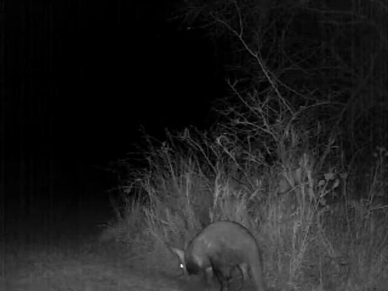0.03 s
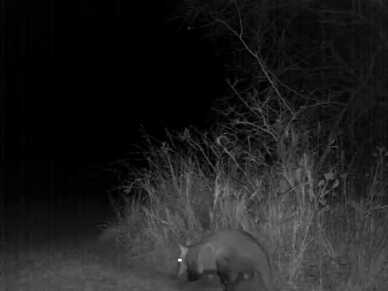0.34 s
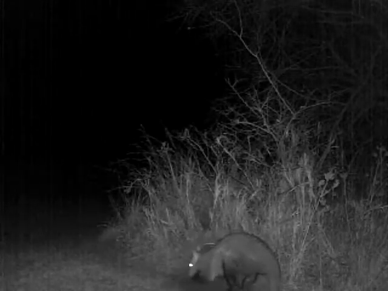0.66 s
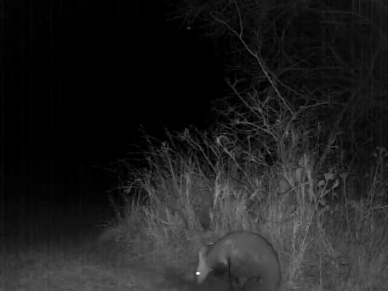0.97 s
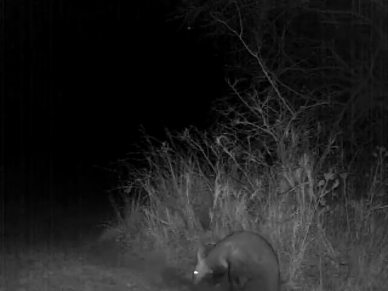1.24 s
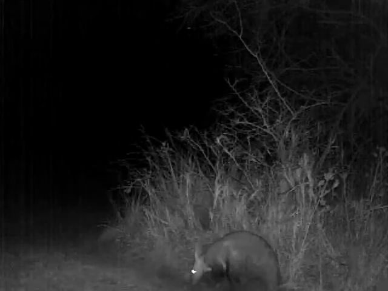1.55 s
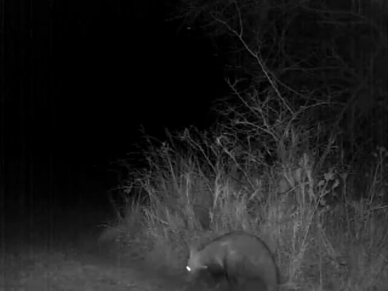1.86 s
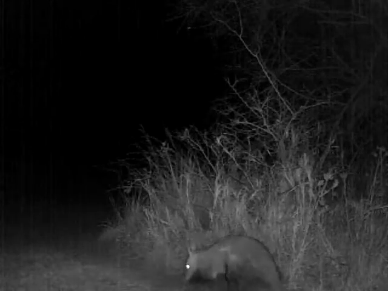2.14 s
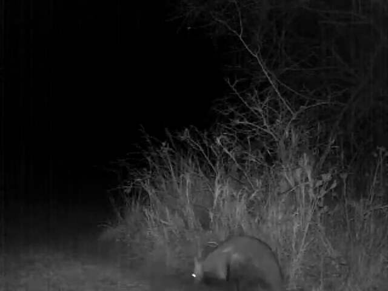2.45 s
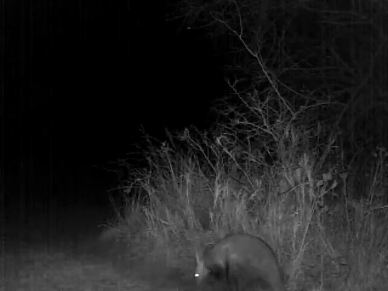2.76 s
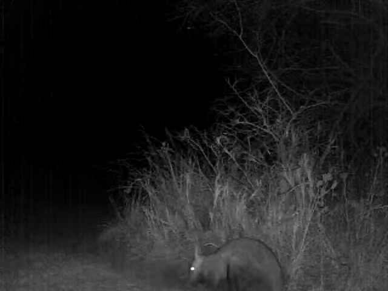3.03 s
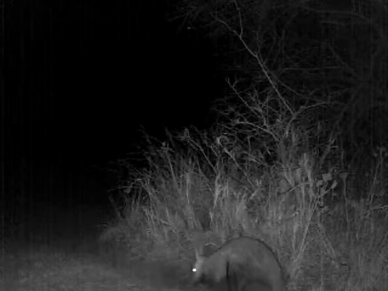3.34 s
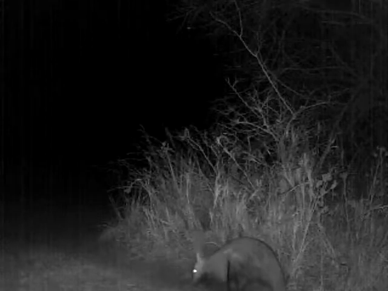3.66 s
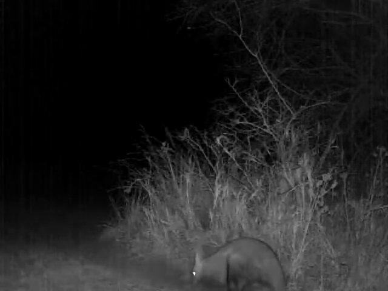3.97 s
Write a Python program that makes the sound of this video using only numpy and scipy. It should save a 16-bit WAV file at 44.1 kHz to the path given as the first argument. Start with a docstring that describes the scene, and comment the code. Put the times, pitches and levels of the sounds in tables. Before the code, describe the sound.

An animal digs in crumbly soil a few metres away. From about 0.2 seconds, claws scrape, paws thump and dry grass rustles, with the sharpest snaps at 0.5 and 0.7 seconds. Activity fades around 1.4 seconds, then resumes at 1.9 with a grassy swish and short scrapes and cracks until 4 seconds. A tiny squeak comes near 2.8. Steady hiss, low electrical pulsing and a faint high whine continue throughout.

```python
"""A steady night hiss and a trail camera's own low electrical pulsing, with a faint insect-like whine.
A few metres from the camera an animal brushes through dry grass and digs: its claws scrape
crumbling soil, earth thuds, paws thump, stalks and clods snap, and once something squeaks.
All of it reaches one small microphone that rings near 3 kHz."""
import sys
import numpy as np
from scipy.fft import rfft, irfft, next_fast_len
from scipy.io import wavfile
from scipy.ndimage import map_coordinates

SR = 44100
rng = np.random.default_rng(int(sys.argv[2]) if len(sys.argv) > 2 else 0)


def generate_wav(signal):
    """Clip the signal to [-1, 1] and save it as 16-bit WAV at the path in sys.argv[1]."""
    frames = np.transpose(np.atleast_2d(signal))
    scaled = np.clip(frames, -1, 1) * 32767
    pcm = np.round(scaled).astype(np.int16)
    wavfile.write(sys.argv[1], SR, pcm)


N = 176400


def amp(db):
    """Decibels to gain."""
    return 10 ** (np.asarray(db) / 20)


def unit(x):
    """Scaled to rms 1."""
    return x / np.sqrt(np.mean(x ** 2) + 1e-20)


def coloured(x, points):
    """x through a causal filter with the given (Hz, dB) points."""
    size = 2 * next_fast_len(N // 2 + 8192)
    hz, db = np.transpose(points)
    gain = amp(np.interp(np.log(np.fft.rfftfreq(size, 1 / SR) + 1), np.log(hz), db))
    # Folding the cepstrum gives minimum phase: nothing rings ahead of a click.
    cepstrum = irfft(np.log(gain), size)
    cepstrum[1:size // 2] *= 2
    cepstrum[size // 2 + 1:] = 0
    return irfft(rfft(x, size) * np.exp(rfft(cepstrum)), size)[:N]


def wobble(rate):
    """A smooth random curve, rate knots a second."""
    knots = rng.standard_normal(int(N * rate / SR) + 4)
    return map_coordinates(knots, [np.arange(N) * rate / SR])


def grains(rate, spread_db, clump_db):
    """Tiny fractures of uneven size, rate a second, that swell in clumps."""
    sizes = amp(spread_db * np.clip(rng.standard_normal(N), -2, 2)) * rng.choice([-1, 1], N)
    breaks = rng.random(N) < rate / SR
    return breaks * sizes * amp(clump_db * wobble(170))


def strokes(rows, level_column):
    """Envelope of all strokes: each rises, holds, then fades over a span centred on its end."""
    t, power = np.arange(N) / SR, np.zeros(N)
    attack_share = 0.16
    for row in rows:
        start, length = row[:2]
        progress = (t - start) / length
        shape = np.clip(progress / attack_share, 0, 1) * np.clip(1.5 - progress, 0, 1)
        power += (amp(row[level_column]) * shape) ** 2
    return np.sqrt(power)


def hiss():
    """Steady hiss of the night air and the microphone."""
    # The colour of the hiss. Each row: frequency in Hz, gain in dB.
    hiss_colour = [(20, 21.5), (70, 8.5), (160, 2), (380, -4), (750, -6), (1600, 0), (3000, -2), (5000, -5),
                   (8000, -5.5), (11000, -6), (15000, -67)]
    return amp(-38.5 + 0.13 * wobble(6.56)) * unit(coloured(rng.standard_normal(N), hiss_colour))


def insect():
    """A faint thin whine, probably an insect far off in the grass."""
    t, pitch_hz = np.arange(N) / SR, 9150
    level = amp(-57 + 2 * wobble(12))
    return level * np.sin(2 * np.pi * pitch_hz * t + 2 * wobble(200))


def camera_pulses():
    """The camera's electronics pulse twelve times a second, on ticks of a 20 Hz clock, so the beat limps."""
    frame_s, tick_s, width_s = 0.083958, 0.04985, 0.0056
    t = np.arange(N) / SR
    frames = np.arange(1, int(N / SR / frame_s) + 1)
    times = tick_s * np.floor(frames * frame_s / tick_s + 0.76) - 0.002
    sizes = amp(-25 + rng.normal(0, 0.52, len(times)))
    return -sum(size / (1 + ((t - at) / width_s) ** 2 / 2) ** 2 for at, size in zip(times, sizes))


def grass():
    """Stalks crackle, fine blades swish and dry tips tick as the body pushes past."""
    # Brushes against dry grass. Each row: start in seconds, length in seconds, stalks in dB, blades in dB.
    brushes = [(.145, 0.047, -41, -41), (.21, 0.22, -38, -40), (.277, 0.045, -32, -32),
               (.33, 0.18, -40, -42.5), (.48, 0.38, -39.5, -41.5), (.673, 0.11, -36, -33),
               (.76, 0.17, -37, -36.5), (.92, 0.17, -42.5, -41.5), (1.11, 0.097, -40, -42.5),
               (1.185, 0.11, -34, -39.5), (1.29, 0.12, -42, -52), (1.47, 0.14, -46, -54),
               (1.9, 0.23, -41.5, -39.5), (1.955, 0.14, -32.5, -28), (2.068, 0.042, -34, -24.5),
               (2.115, 0.082, -36.5, -39), (2.19, 0.14, -38.5, -41), (2.355, 0.08, -36, -37.5),
               (2.435, .075, -36, -57), (2.67, 0.29, -45.5, -48), (2.89, 0.15, -37.5, -40.5),
               (3.19, 0.083, -37, -48), (3.365, 0.051, -38, -32.5), (3.41, 0.12, -43, -54),
               (3.59, 0.11, -45, -46), (3.775, 0.036, -44, -41)]
    # The mid-range crackle of stalks. Each row: frequency in Hz, gain in dB.
    stalk_colour = [(200, -29.5), (900, -18.5), (1800, -2.5), (3000, 0), (4200, -3.5), (6000, -11),
                    (12000, -48)]
    # The high swish of blades. Each row: frequency in Hz, gain in dB.
    blade_colour = [(500, -32), (3000, -7), (5000, -2.5), (7000, -2.5), (10500, -8), (14000, -37)]
    stalks = unit(coloured(grains(rate=3500, spread_db=4.0, clump_db=2.04), stalk_colour))
    swish = unit(grains(rate=5000, spread_db=-1.5, clump_db=2.0))
    ticks = amp(-1) * unit(grains(rate=110, spread_db=3.0, clump_db=0.0))
    blades = unit(coloured(swish + ticks, blade_colour))
    return stalks * strokes(brushes, level_column=2) + blades * strokes(brushes, level_column=3)


def digging():
    """Claws break crumbs of soil loose while the earth thuds under them."""
    # Claw strokes. Each row: start in seconds, length in seconds, grit in dB, thud of earth in dB.
    scrapes = [(.287, 0.046, -28.5, -31), (.343, 0.078, -37.5, -37.5), (.463, 0.023, -35, -34.5),
               (.496, 0.042, -29.5, -31), (.548, .035, -36, -35), (.678, 0.023, -29.5, -33),
               (.715, 0.08, -39, -45), (.798, 0.13, -40, -41.5), (.95, 0.028, -37, -40),
               (1.865, 0.01, -35.5, -44.5), (1.905, 0.023, -37.5, -37.5), (1.99, 0.12, -36, -41),
               (2.12, 0.027, -36, -38.5), (2.222, 0.033, -29.5, -38.5), (2.26, .055, -35, -42),
               (2.355, 0.062, -35, -38), (2.43, 0.14, -40, -47), (2.558, 0.047, -35.5, -43.5),
               (2.622, 0.051, -34.5, -40), (3.0, 0.035, -33, -43), (3.053, 0.041, -35.5, -39.5),
               (3.09, 0.033, -34.5, -51), (3.12, 0.074, -38, -41.5), (3.21, 0.055, -32.5, -36.5),
               (3.355, 0.032, -32.5, -36.5), (3.453, 0.019, -41, -35), (3.473, 0.018, -32.5, -43),
               (3.522, 0.048, -38.5, -48), (3.588, .018, -30, -33), (3.63, 0.063, -34.5, -41.5),
               (3.708, 0.022, -35, -48), (3.735, .07, -37, -41.5), (3.83, 0.087, -38.5, -50),
               (3.945, .055, -39, -49)]
    # The rasp of crumbling soil. Each row: frequency in Hz, gain in dB.
    grit_colour = [(100, -12), (500, -8), (900, -4.5), (1700, 4), (2600, 2), (3600, -3.5), (6000, -12.5),
                   (11000, -22.5), (16000, -36)]
    # The low thud of earth. Each row: frequency in Hz, gain in dB.
    earth_colour = [(30, 7.5), (80, -1), (190, 0), (360, -1), (490, -9.5), (800, -12.5), (2000, -44),
                    (6000, -76)]
    grit = unit(coloured(grains(rate=2000, spread_db=4.5, clump_db=2.56), grit_colour))
    earth = unit(coloured(grains(rate=1800, spread_db=2.5, clump_db=-0.6), earth_colour))
    return grit * strokes(scrapes, level_column=2) + earth * strokes(scrapes, level_column=3)


def steps():
    """A paw's weight gives a short dull thump in the ground."""
    # Paws landing or pushing earth aside. Each row: start in seconds, level in dB, pitch in Hz.
    footfalls = [(.292, -27, 99), (.308, -26, 72.4), (.35, -42, 109), (0.508, -31, 91), (.715, -31, 70),
                 (1.128, -31, 70), (2.135, -28.5, 78.5), (3.592, -30, 155)]
    attack_s, t60_s = 0.004, 0.12
    thumps, t = np.zeros(N + SR), np.arange(SR // 4) / SR
    shape = amp(-60 * t / t60_s) * (1 - np.exp(-t / attack_s))
    for start, db, hz in footfalls:
        thumps[round(start * SR):][:len(t)] += amp(db) * shape * np.sin(2 * np.pi * hz * t)
    return thumps[:N]


def snaps():
    """Each break is a click of a few cycles, a weaker crack as a second fibre goes, and splinter fizz."""
    # Stalks and clods breaking. Each row: start in seconds, level in dB, pitch in Hz.
    breaks = [(0.4012, -16, 3400), (.4018, -18, 8100), (.468, -16.5, 2830), (.4755, -22, 2700),
              (0.4968, -10, 2740), (.5142, -3, 2800), (0.5892, -19, 2490), (0.636, -13, 2470),
              (.676, -4, 2670), (0.6755, -12, 6000), (0.6917, -13.5, 2920), (.731, -12.5, 7250),
              (0.763, -17.5, 2980), (0.8021, -16, 2600), (.828, -22, 3000), (.869, -16.5, 2940),
              (.954, -17, 2610), (2.083, -17, 7000), (2.102, -16, 8500), (1.872, -32, 2400),
              (1.982, -22, 2970), (1.9968, -18.5, 3200), (2.152, -13, 6640), (2.239, -17, 7000),
              (2.388, -9.5, 2600), (2.545, -22, 2400), (2.562, -20.5, 2750), (2.572, -20, 2000),
              (2.591, -17, 2120), (2.6265, -14.5, 2080), (2.634, -12.5, 2090), (3.007, -18.5, 2870),
              (3.0577, -23.5, 2800), (3.095, -16.5, 2250), (3.2042, -12.5, 2900), (3.315, -23, 2360),
              (3.359, -15, 2020), (3.528, -20.5, 1920), (3.5925, -11.5, 2300), (3.672, -19.5, 1770)]
    # The fizz of splinters. Each row: frequency in Hz, gain in dB.
    splinter_colour = [(100, -8.5), (700, -0.5), (2000, -2), (4000, 2.5), (7000, -8), (12000, -8.5)]
    attack_s, click_t60_s = 0.00012, 0.002
    recrack_db, longest_lag_s = -6, 0.001754
    splinter_db, splinter_t60_s = -19.5, 0.039
    clicks, fizz_level, t = np.zeros(N + SR), np.zeros(N + SR), np.arange(SR // 10) / SR
    shape = amp(-60 * t / click_t60_s) * (1 - np.exp(-t / attack_s))
    lags = rng.uniform(0.5, 1, len(breaks)) * longest_lag_s
    for (start, db, hz), lag in zip(breaks, lags):
        click = amp(db) * shape / shape.max() * np.sin(2 * np.pi * hz * t)
        clicks[round(start * SR):][:len(t)] += click
        clicks[round((start + lag) * SR):][:len(t)] += amp(recrack_db) * click
        fizz_level[round(start * SR):][:len(t)] += amp(db + splinter_db - 60 * t / splinter_t60_s)
    fizz = unit(coloured(rng.standard_normal(N), splinter_colour))
    return clicks[:N] + fizz_level[:N] * fizz


def squeak():
    """A tiny squeak, perhaps one stalk rubbing on another."""
    peak_s, width_s, pitch_hz = 2.778, 0.0051, 3270
    t = np.arange(N) / SR - peak_s
    level = amp(-33.5) * np.exp(-(t / width_s) ** 2 / 2)
    return level * np.sin(2 * np.pi * pitch_hz * t + 0.75 * wobble(300))


def scene():
    """The animal a few metres off, over the night background and the camera's pulsing, in mono."""
    animal = digging() + steps() + grass() + snaps() + squeak()
    return (animal + insect() + hiss() + camera_pulses())[None]


def record(dry):
    """The small microphone honks near 3 kHz, then the camera cuts off the top treble."""
    # The microphone's response. Each row: frequency in Hz, gain in dB.
    microphone = [(100, -1.5), (1000, -2.5), (2450, -4), (2980, 4.5), (3600, -2.5), (4300, -10.5),
                  (5200, -13.5), (9500, -14.5), (10300, -17.5), (11000, -35)]
    top_hz = 11350
    heard = coloured(dry[0], microphone)
    passband = np.fft.rfftfreq(2 * N, 1 / SR) < top_hz
    return irfft(rfft(heard, 2 * N) * passband)[None, :N]


dry = scene()
out = record(dry)
generate_wav(out)
```